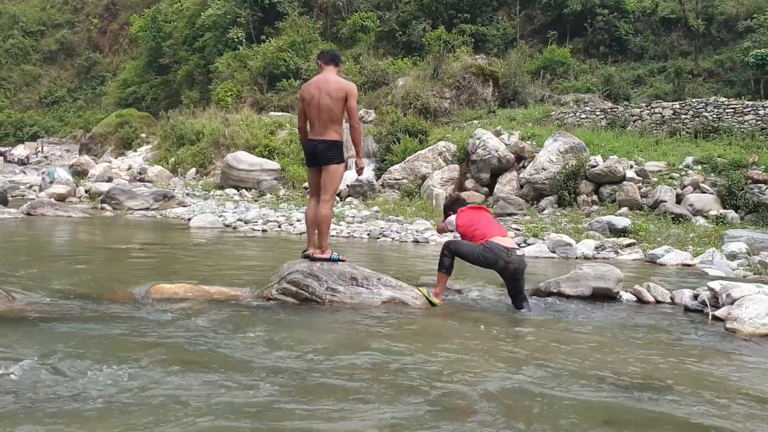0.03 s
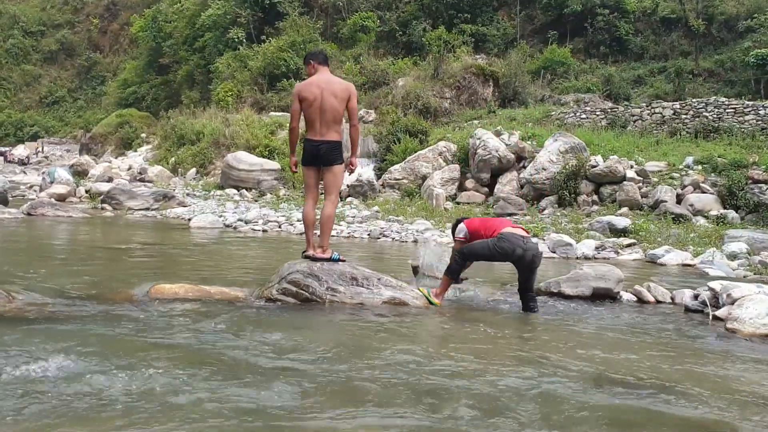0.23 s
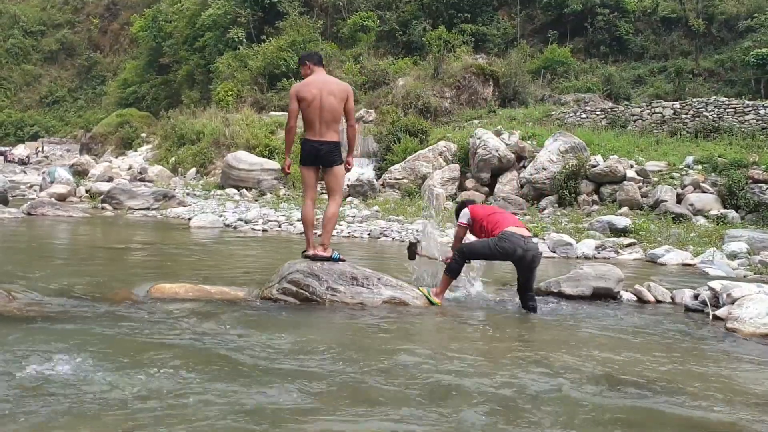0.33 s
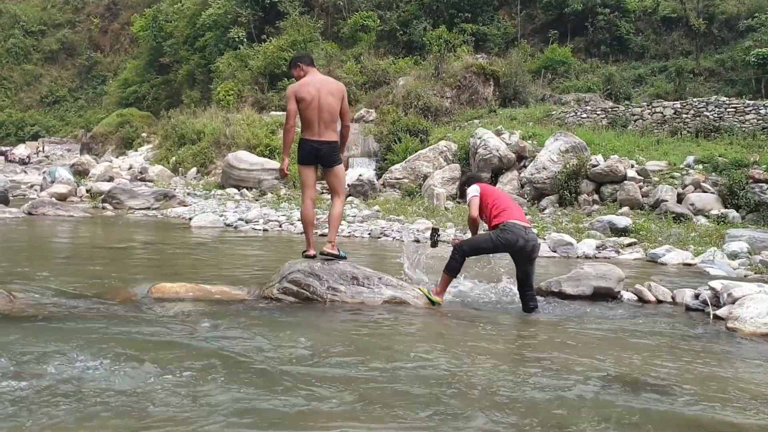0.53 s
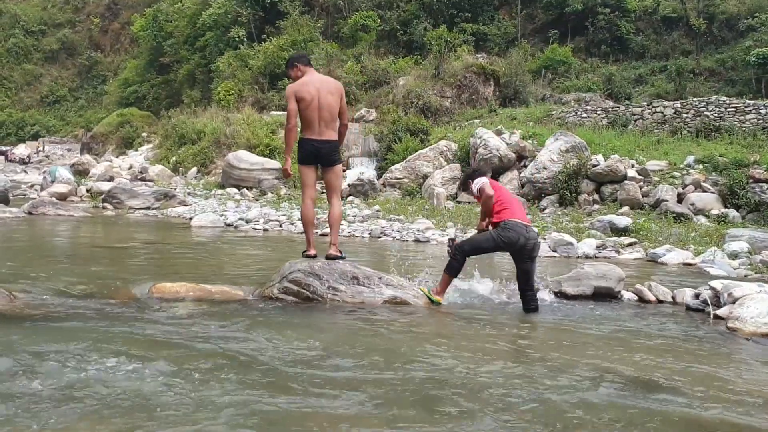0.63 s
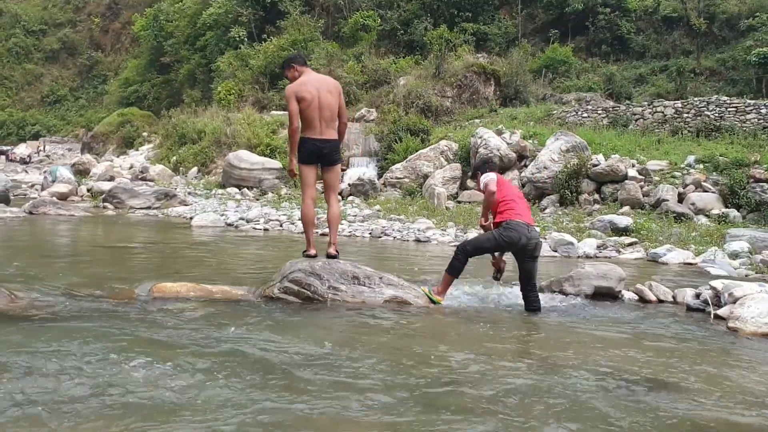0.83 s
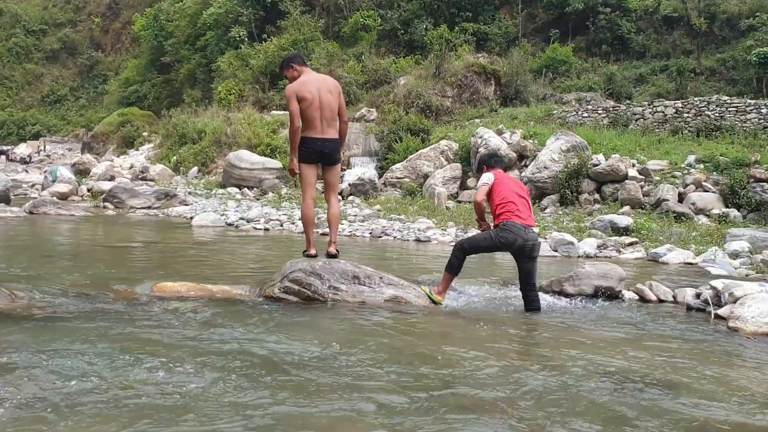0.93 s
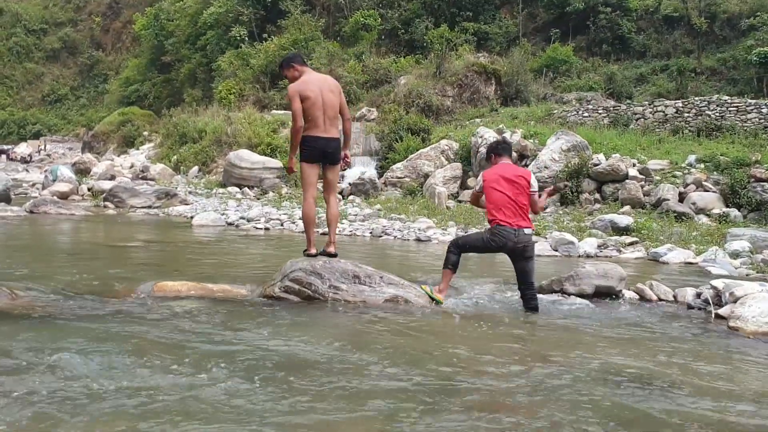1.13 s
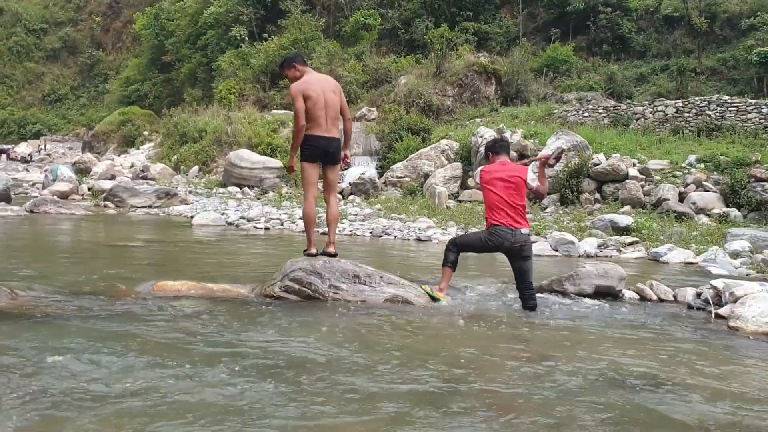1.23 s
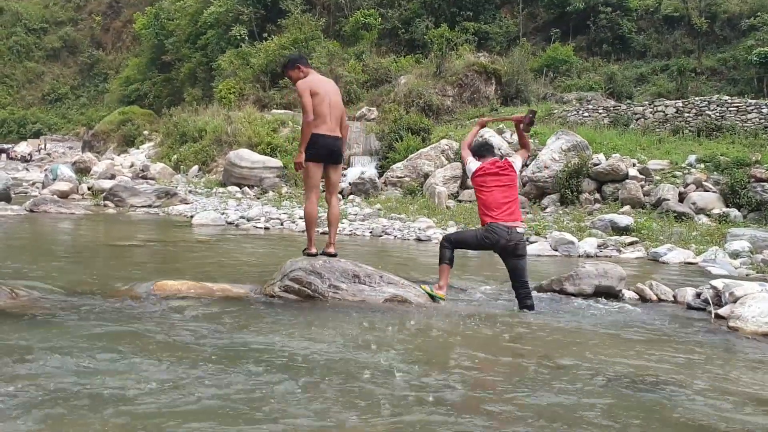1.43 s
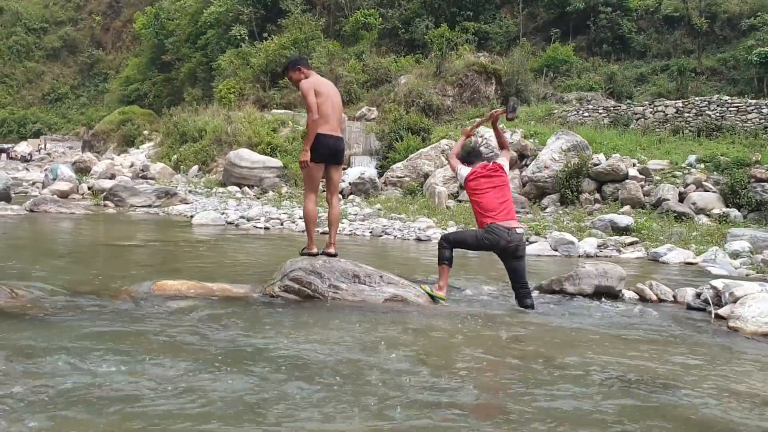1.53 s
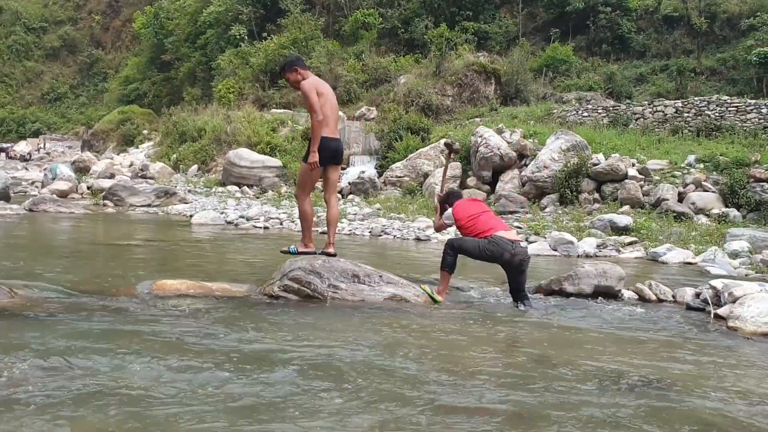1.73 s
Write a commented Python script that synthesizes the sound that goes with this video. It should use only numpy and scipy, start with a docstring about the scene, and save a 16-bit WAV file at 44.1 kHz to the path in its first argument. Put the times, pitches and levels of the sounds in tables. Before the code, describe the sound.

A hammer hits a boulder once through shallow water, a sharp, heavy knock with a gritty crunch and a brief splash. Drops patter back while the river keeps rushing and bubbling and a breeze buffets the microphone.

```python
"""A river rushes and bubbles while a breeze buffets the two microphone ports. At 0.2 s a hammer swings
through shallow water onto a boulder: two wet ticks, then one dull heavy knock from the stone's modes.
With it come a crunch of grit, a splash, a thin ring of the steel head and a short hollow hum.
A small rebound follows, and thrown drops patter back."""
import sys
import numpy as np
from scipy import signal
from scipy.fft import rfft, irfft, next_fast_len
from scipy.io import wavfile
from scipy.ndimage import uniform_filter1d, map_coordinates

SR = 44100
rng = np.random.default_rng(int(sys.argv[2]) if len(sys.argv) > 2 else 0)


def output_pcm(signal):
    """Save a mono or channel-first signal as 16-bit PCM at the path in sys.argv[1].

    Samples are clipped to [-1, 1] before scaling.
    """
    pcm = np.clip(np.atleast_2d(signal).T, -1, 1) * 32767
    wavfile.write(sys.argv[1], SR, np.round(pcm).astype(np.int16))


N = 79380
TOP_HZ = 15900

# Each row: start in seconds, relative level in dB, softness in seconds.
CONTACTS = [(.2217, -13, 0.00053), (0.2222, -10.5, 0.00067), (0.2233, 1.76, 0.00043),
            (0.2847, -15.5, 0.00069)]
# Each row: frequency in Hz, relative level in dB, t60 in seconds.
STONE_MODES = [(146, -18.5, 0.025), (408, -7, 0.034), (431, -6, 0.034), (597, -3, 0.011), (998, 0.5, 0.014),
               (1270, -22.5, 0.0058), (1714, -11.5, 0.02), (2060, -6, 0.027), (2700, -15.5, 0.045),
               (3820, -29, 0.014)]
BLOW_S = CONTACTS[2][0]

def boulder(low_cut_hz=117):
    """Each contact of the head rings the stone's short modes; a softer contact is duller."""
    knock = np.zeros(N)
    for start_s, db, soft_s in CONTACTS:
        t = since(start_s)
        ring = (t > 0) * sum(amp(mode_db) * decay(t, t60_s) * np.cos(2 * np.pi * hz * t)
                             for hz, mode_db, t60_s in STONE_MODES)
        knock -= amp(db) * filtered(ring, lambda hz: 1 / (1 + 1j * np.pi * hz * soft_s) ** 2)
    knock = filtered(knock, lambda hz: 1j * hz / (low_cut_hz + 1j * hz))
    return amp(-0.5) * knock * pan(0.5)


# Each row: frequency in Hz, relative density in dB.
GRIT_SPECTRUM = [(500, -18), (1300, -4.5), (2150, 10), (2700, -16), (3100, -21), (3800, -4.5), (5500, -41)]

def grit():
    """Grains of stone crunch briefly under the head."""
    envelope = amp(-20) * fade(since(CONTACTS[1][0]), attack_s=0.00028, t60_s=0.027)
    return envelope * noise(GRIT_SPECTRUM, [(2000, 0.62)], patchy_db=-4.5)


# Each row: frequency in Hz, relative density in dB.
SPLASH_SPECTRUM = [(100, -20), (250, -29), (430, 12), (750, -1.5), (1060, -0.5), (1450, -11.5), (2300, -11),
                   (4000, -23.5), (8000, -47)]

def splash():
    """Water thrown up by the blow makes a dull, fading wash."""
    envelope = amp(-28.5) * fade(since(BLOW_S), attack_s=0.00099, t60_s=0.25)
    return envelope * noise(SPLASH_SPECTRUM, [(400, 0.41), (2000, 0.31)], patchy_db=-1)


# Each row: frequency in Hz, level in dB, t60 in seconds.
STEEL_MODES = [(7100, -38, 0.059), (7850, -43.5, 0.11), (8670, -30.5, 0.026), (11500, -30.5, 0.11),
               (11950, -28.5, 0.11), (14800, -32, 0.077)]

def steel_head(attack_s=0.003, waver_rad=1.1):
    """The head's modes ring thinly, with a phase that wavers differently left and right."""
    t = since(BLOW_S)
    ring = np.zeros((2, N))
    for channel in ring:
        for hz, db, t60_s in STEEL_MODES:
            phase = 2 * np.pi * hz * t + waver_rad * wobble(600)
            channel += amp(db) * fade(t, attack_s, t60_s) * np.sin(phase)
    return ring * pan(1)


def hum(hz=425, waver_rad=0.5, sag_db_per_s=72, hold_s=0.081):
    """A hollow, wavering hum hangs on after the blow, then dies."""
    t = since(BLOW_S)
    level_db = -31.5 - sag_db_per_s * t + 2.7 * wobble(113.6)
    release = decay(np.maximum(t - hold_s, 0), t60_s=0.09)
    tone = np.sin(2 * np.pi * hz * t + waver_rad * wobble(131.3))
    return (t > 0) * amp(level_db) * release * tone * pan(1.5)


# Each row: start in seconds, level in dB, t60 in seconds.
TICKS = [(0.2114, -32, .02), (0.216, -28.5, 0.023), (0.3134, -33, 0.01), (0.987, -41, 0.016),
         (1.083, -39, 0.015), (1.477, -37, 0.015)]
# Each row: frequency in Hz, relative density in dB.
TICK_SPECTRUM = [(300, -2), (2000, 2.5), (4000, -7), (7000, -10.5), (11000, 9), (13000, -4.5),
                 (16000, -12.5)]

def water_ticks(spray_per_s=110, spray_db=-45, range_db=13):
    """Water on the head and falling drops tick brightly over a fine, constant crackle of spray."""
    when, weakness = rng.uniform(size=(int(spray_per_s * N / SR), 2)).T
    drops = np.bincount((when * N).astype(int), amp(spray_db - range_db * np.sqrt(weakness)), N)
    drop_envelope = fade(np.arange(SR // 20) / SR, attack_s=0.000067, t60_s=0.005)
    spray = signal.fftconvolve(drops, drop_envelope)[:N]
    near = sum(amp(db) * fade(since(start_s), 0.00069, t60_s) for start_s, db, t60_s in TICKS)
    return (near + spray) * noise(TICK_SPECTRUM, [(1000, 0.5)], patchy_db=0)


# Each row: start in seconds, level in dB, starting pitch in Hz, t60 in seconds.
NEAR_BUBBLES = [(.559, -32.5, 1960, 0.023), (.603, -35.5, 1126, .04), (.826, -36.5, 2160, .02),
                (.964, -38.5, 2070, 0.012), (1.088, -42, 1020, 0.039), (1.115, -41, 2880, .022),
                (1.158, -42, 1530, 0.034), (1.325, -47, 4270, 0.02), (1.363, -46, 3190, 0.022),
                (1.379, -37, 1050, 0.026), (1.399, -41, 2830, 0.019), (1.494, -41, 1350, 0.047),
                (1.51, -50, 3040, 0.022), (1.691, -45.5, 3150, .02), (1.7355, -34, 1300, 0.028)]

def bubbles(rows, rise_per_s=1.8):
    """Each bubble rings as a damped sine that rises in pitch."""
    out = np.zeros(N + SR)
    t = np.arange(SR // 16) / SR
    for start_s, db, hz, t60_s in rows:
        phase = 2 * np.pi * hz * t * (1 + rise_per_s * t / 2)
        attack_s = min(0.00045, t60_s / 10)
        out[int(start_s * SR):][:len(t)] += amp(db) * fade(t, attack_s, t60_s) * np.sin(phase)
    return out[:N]


def gurgle(per_s=130, median_hz=1156, max_db=-41.5, range_db=15, ring_cycles=20):
    """Many bubbles ring at random times and pitches, most far weaker than the loudest."""
    when, rank, weakness = rng.uniform(0.01, 0.99, (int(per_s * N / SR), 3)).T
    hz = np.minimum(median_hz * (rank / (1 - rank)) ** 0.324, TOP_HZ)
    db = max_db - range_db * np.sqrt(weakness)
    return bubbles(zip(when * N / SR, db, hz, ring_cycles / hz))


# Each row: frequency in Hz, relative density in dB.
RIVER_SPECTRUM = [(30, -2), (90, 3), (170, 3.5), (310, -1.5), (480, 0.5), (750, -4), (1000, -8),
                  (1600, -10), (2250, -10), (3100, -19.5), (5300, -26), (7500, -32), (10500, -23.5),
                  (16000, -39)]
# Each row: frequency in Hz, left-right correlation.
RIVER_CORRELATION = [(80, 0.3), (250, 1), (600, 0.56), (1500, 0.35), (3000, 0.4), (8000, 0.035)]
# Each row: time in seconds, level in dB.
RIVER_LEVEL = [(0, -37), (.2, -37), (.4, -41.5), (.6, -39.5), (.85, -42), (1.05, -42), (1.3, -43.5),
               (1.5, -42.5), (1.8, -43.5)]

def river(waver_db=0.8, left_lead_s=0.00041):
    """Flowing water makes a patchy rush that reaches the left port first."""
    envelope = amp(curve(RIVER_LEVEL) + waver_db * wobble(13.9))
    rush = envelope * noise(RIVER_SPECTRUM, RIVER_CORRELATION, patchy_db=1.5)
    return filtered(rush, lambda hz: np.exp(1j * np.pi * hz * left_lead_s * np.array([[1], [-1]])))


# Each row: time in seconds, level before panning in dB.
GUSTS = [(0, -37), (.05, -39.5), (.11, -48), (.36, -36), (.44, -36), (.48, -38.5), (.53, -32),
         (.575, -44.5), (.61, -31), (.66, -38), (.72, -33), (.76, -44), (.82, -31), (.9, -45.5),
         (.96, -34.5), (1.04, -49), (1.1, -46), (1.142, -33), (1.195, -47), (1.26, -37.5), (1.38, -45.5),
         (1.48, -61), (1.68, -52), (1.735, -46), (1.8, -54)]
# Each row: frequency in Hz, relative density in dB.
BUFFET_SPECTRUM = [(20, -52), (35, -8), (52, -1), (82, 3.5), (115, -6.5), (190, -14.5), (400, -36),
                   (1000, -51.5)]

def breeze():
    """Short gusts buffet the ports with a rumble, different at each and stronger on the left."""
    rumble = noise(BUFFET_SPECTRUM, [(60, 0.12)], patchy_db=1.5)
    running_rms = np.sqrt(np.abs(uniform_filter1d(rumble ** 2, size=2600)) + 1e-6)
    return amp(curve(GUSTS)) * rumble / running_rms * pan(4.5)


def noise(spectrum, correlation, patchy_db):
    """Stereo noise of rms 1 with patches of random gain; correlation is (Hz, left-right) points."""
    cells = signal.stft(rng.standard_normal((2, N)), nperseg=512)[2]
    patches = uniform_filter1d(rng.standard_normal(cells.shape[1:]), size=5, axis=0)
    patches = uniform_filter1d(patches, size=7, axis=1)
    pair = signal.istft(cells * amp(patchy_db * unit(patches)), nperseg=512)[1][:, :N]

    def mid_side_gains(hz):
        angle = np.arccos(np.clip(along(correlation, hz), -1, 1)) / 2
        return amp(along(spectrum, hz)) * [np.cos(angle), np.sin(angle)]

    mid, side = filtered(pair, mid_side_gains)
    return unit(np.array([mid + side, mid - side]))


def amp(db):
    """Decibels to gain."""
    return 10 ** (np.asarray(db) / 20)


def pan(db):
    """Gains that lift the left and lower the right by db each."""
    return amp([[db], [-db]])


def unit(x):
    """Scale to rms 1."""
    return x / np.sqrt(np.mean(x ** 2) + 1e-20)


def since(start_s):
    """Seconds since the start, zero before it."""
    return np.maximum(np.arange(N) / SR - start_s, 0)


def decay(t, t60_s):
    """Exponential fall of 60 dB in t60_s."""
    return np.exp(-np.log(1000) * t / t60_s)


def fade(t, attack_s, t60_s):
    """Quick rise, exponential decay."""
    return (1 - np.exp(-t / attack_s)) * decay(t, t60_s)


def curve(points):
    """(Seconds, value) points read at every sample."""
    return np.interp(since(0), *np.transpose(points))


def along(points, hz):
    """(Hz, value) points read on a log axis."""
    knots_hz, values = np.transpose(points)
    return np.interp(np.log(hz + 1), np.log(knots_hz + 1), values)


def wobble(knots_per_s):
    """Smooth random curve."""
    knots = rng.standard_normal(int(N * knots_per_s / SR) + 4)
    return map_coordinates(knots, [since(0) * knots_per_s])


def filtered(x, response):
    """Apply a complex response, a function of Hz."""
    size = next_fast_len(N + SR // 2)
    return irfft(rfft(x, size) * response(np.fft.rfftfreq(size, 1 / SR)), size)[..., :N]


def scene():
    """The blow and all that it sets off, over river and breeze."""
    blow = boulder() + grit() + hum() + splash() + steel_head()
    return blow + water_ticks() + river() + gurgle() + bubbles(NEAR_BUBBLES) + breeze()


# Each row: frequency in Hz, left gain in dB, right gain in dB.
PORT_RESPONSE = [(185, 0, 0), (1070, 3.82, -0.6), (3170, 0.5, -0.5), (5940, 1, 1), (7780, -14, -3.5),
                 (8230, -28, 2), (9360, -18.5, 5.5), (11460, -7.5, -0.5), (13200, -2, -7),
                 (15200, -2.5, -11)]

def record(dry):
    """Each microphone port colours the treble in its own way; nothing passes above TOP_HZ."""
    ports = np.array(PORT_RESPONSE)
    left, right = ports[:, [0, 1]], ports[:, [0, 2]]
    return filtered(dry, lambda hz: amp([along(left, hz), along(right, hz)]) * (hz < TOP_HZ))


dry = scene()
out = record(dry)
output_pcm(out)
```